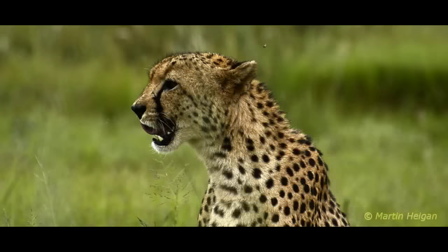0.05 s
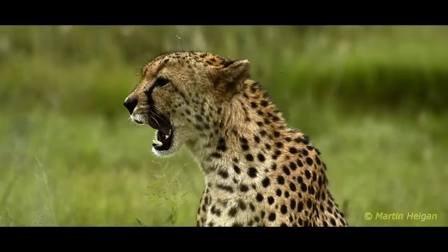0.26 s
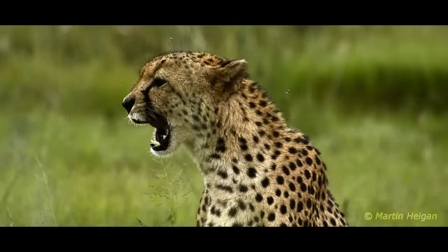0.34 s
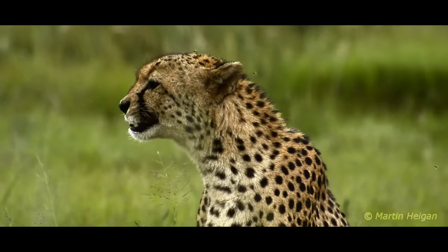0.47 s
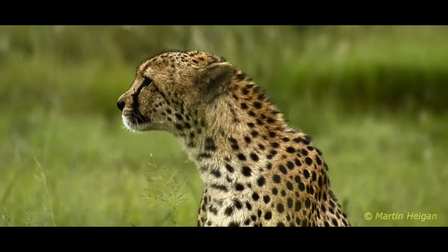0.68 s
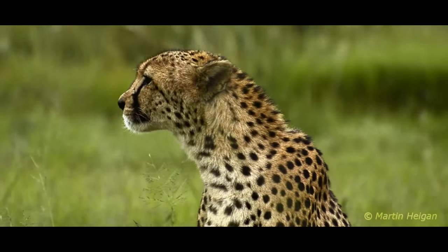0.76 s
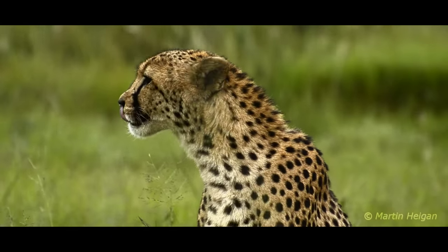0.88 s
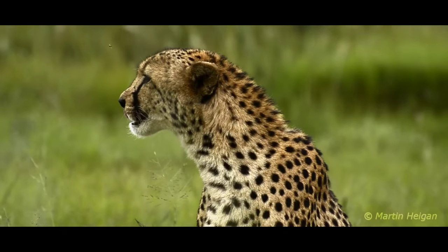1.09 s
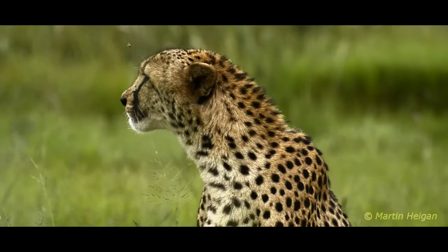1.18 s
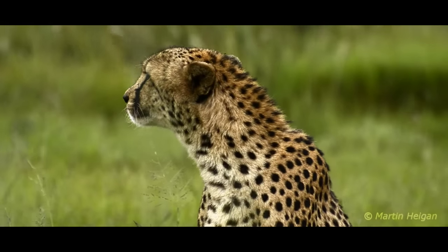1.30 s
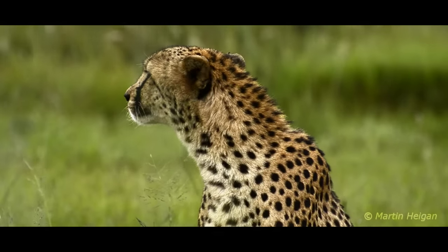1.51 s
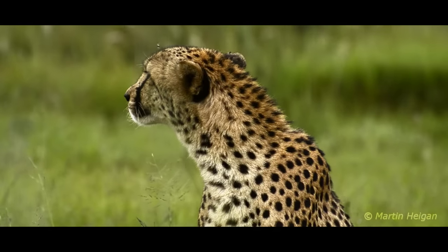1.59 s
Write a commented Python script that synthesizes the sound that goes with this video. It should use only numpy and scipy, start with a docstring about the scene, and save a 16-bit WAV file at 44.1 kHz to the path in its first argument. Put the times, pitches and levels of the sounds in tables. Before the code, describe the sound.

One short, clear cheetah chirp near the start, central and fairly dry, after low wind puffs and thin bird whistles; afterwards more faint birds, a wind puff and muffled bumps over outdoor hum and light wide hiss.

```python
"""A cheetah gives one short chirp in open grassland, over a steady faint hum, outdoor air and hiss.
First come two low puffs of wind and the first thin whistles of far birds, made from gliding tones.
Then the chirp: an arched, nearly pure note from a stack of sine waves, ending in a weak falling squeak.
More birds follow, then soft bumps, with one more puff among them; bumps and puffs are swells of noise."""
import sys
import numpy as np
from scipy import signal
from scipy.fft import rfft, irfft, next_fast_len
from scipy.io import wavfile
from scipy.ndimage import uniform_filter1d

SR = 44100
rng = np.random.default_rng(int(sys.argv[2]) if len(sys.argv) > 2 else 0)


def transcribe(u):
    """Save the signal u as a 16-bit wav file named by the first command-line argument.

    u: samples, shape (n,) or (channels, n), limited to [-1, 1]; the rate is SR.
    q: integer samples, one column per channel.
    """
    v = np.clip(np.atleast_2d(u).T, -1, 1)
    q = np.round(v * 32767).astype(np.int16)
    wavfile.write(sys.argv[1], SR, q)


N = 72765
T = np.arange(N) / SR  # time of every sample, in seconds

# Pitch of the vocal folds, before its small random shake: t/s, f/Hz
CHIRP_PITCH = [(.21, 612), (.219, 565.6), (.236, 593.4), (.256, 613), (.27, 613.3), (.285, 603.5),
               (.306, 577), (.316, 546), (.325, 553), (.337, 530), (.356, 408)]
# Level that drives the partials of the chirp: t/s, level/dB
CHIRP_LEVEL = [(.209, -58), (.2145, -32), (.224, -29), (.242, -21), (.264, -14.5), (.287, -11.5),
               (.298, -14), (.312, -22.5), (.323, -31.5), (.331, -50.5), (.35, -39), (.362, -53)]
# Partials of the voice: multiple of the pitch, level/dB at full drive, growth/dB per dB of drive
VOICE_PARTIALS = [(1, -46, 0.03), (2, -12, 1), (3, -48.5, .15), (4, -42.5, .45), (5, -52, 0.23),
                  (6, -73.5, 2.2), (7, -76, 3), (9, -75, 0.8), (10, -71.5, 0.5), (13, -79.5, 1.7)]
# Colour of the air rushing through the throat: f/Hz, relative level/dB per Hz
THROAT_COLOUR = [(400, -26), (1100, -7), (1800, 3.5), (2700, -5), (4000, -21.5), (8000, -24.5),
                 (14000, -43)]
# Far bird notes: start t/s, length/s, start f/Hz, middle f/Hz, end f/Hz, level/dB at the middle
BIRD_NOTES = [(0.041, 0.036, 4950, 4680, 4280, -66), (.105, 0.046, 4550, 4330, 4270, -61),
              (0.291, 0.08, 4700, 4560, 4230, -67), (.385, .055, 4450, 4250, 4170, -61),
              (0.574, 0.032, 4150, 4140, 4050, -62.5), (.645, 0.06, 4100, 4180, 4200, -66.5),
              (.618, .05, 1580, 1800, 1870, -56), (.669, 0.0216, 2080, 1920, 1710, -54)]
# Soft dull bumps: peak t/s, rise/s, decay/s, peak level/dB
BUMP_EVENTS = [(.617, .014, .018, -43), (1.22, .005, 0.022, -49), (1.278, 0.014, 0.022, -45),
               (1.302, .012, .032, -41.5), (1.403, 0.0085, 0.018, -41.5)]
# Colour of the bumps: f/Hz, relative level/dB per Hz
BUMP_SPECTRUM = [(60, -12), (140, -6), (230, -12.5), (345, 1.5), (440, -5.5), (530, -7.5), (700, -17.5),
                 (880, -15), (1100, -32), (3000, -33), (9000, -67)]
# Puffs of wind: peak t/s, rise/s, decay/s, peak level/dB
PUFF_EVENTS = [(.008, 0.015, 0.027, -39), (.085, .015, 0.014, -44), (.99, 0.034, .03, -42)]
# Colour of the puffs: f/Hz, relative level/dB per Hz
PUFF_SPECTRUM = [(8, -4.5), (25, -0.5), (45, -6.5), (80, -16), (200, -37), (1000, -87)]
# Colour of the outdoor air, the same in both ears: f/Hz, relative level/dB per Hz
AIR_COLOUR = [(10, -6.5), (35, 1.5), (65, -6.5), (95, -5), (135, 0), (195, -6.5), (290, -6), (420, -12),
              (800, -16.5), (1600, -20), (2450, -26.5), (3600, -20), (4250, -26), (4700, -37),
              (6000, -44.5), (15000, -53.5)]
# Faint wavering hum: f/Hz, width/Hz, level/dB
HUM_TONES = [(39.5, 8, -62), (76, 6, -64), (120.8, 8, -57.5), (158, 7.7, -59.5), (272, 11, -58.5),
             (612, 16, -65), (1218, 22, -70.5), (1517, 30, -69), (1828, 30, -77.5)]
# Colour of the microphone hiss: f/Hz, relative level/dB per Hz
HISS_COLOUR = [(150, -35), (260, -8), (420, -2.5), (1600, 1), (3500, -3), (6000, -8), (9000, -10.5),
               (14000, -16.5), (16000, -16.5)]
# Narrow dips in the treble: f/Hz, width/Hz, depth from 0 to 1
TREBLE_DIPS = [(5693, 190, .72), (6910, 103, 0.6), (14950, 330, .9)]

FULL_DB = -12  # drive at which the partials have their listed levels
EDGE_S = 0.0047  # fade at each end of the chirp
JITTER, ROUGH_JITTER = 0.0023, 0.014  # random shake of the pitch, as a fraction; extra at the end
ROUGH_FROM_S, ROUGH_RAMP_S = 0.306, 0.02
# Random shake of the level: none for a partial with growth 1, more the further its growth is from 1
SHIMMER_DB = 1.5
THROAT_AIR_DB = -59
# All partials but the second come in more softly and start to fade as the closing squeak begins
SIDE_RISE_S, SIDE_FADE_FROM_S, SIDE_FADE_DB_PER_S = 0.0089, 0.334, 500
# The mouth opens widest just before the loudest moment and lifts the fourth partial
MOUTH_S, MOUTH_WIDTH_S, MOUTH_LIFT_DB = 0.279, 0.021, 8
BIRD_WAVER = 0.03  # random shake of the pitch, as a fraction, for a note at 4500 Hz
BIRD_WET_DB, BIRD_T60_S = -8, 0.2  # level of the echo tail, time it takes to drop 60 dB
AIR_DB, PATCH_DB, HISS_DB = -48.5, 1.5, -62
CUTOFF_HZ, FADE_S = 15700, 0.004


def amp(db):
    """Turns decibels into a gain."""
    return 10 ** (np.asarray(db) / 20)


def unit(x):
    """Scales a signal to an average strength (rms) of 1."""
    return x / np.sqrt(np.mean(x ** 2) + 1e-20)


def filtered(x, gain):
    """Turns each frequency up or down by gain(frequency)."""
    size = next_fast_len(N + 4096)
    spectrum = rfft(x, size)
    return irfft(spectrum * gain(np.fft.rfftfreq(size, 1 / SR)), size)[..., :N]


def noise(colour):
    """Random noise of rms 1 whose spectrum passes through (Hz, dB) points."""
    hz, db = np.transpose(colour)
    white = rng.standard_normal(N)
    return unit(filtered(white, lambda f: amp(np.interp(np.log(f + 1), np.log(hz), db))))


def wander(rate_hz):
    """Smooth random ups and downs of rms 1; a higher rate moves faster."""
    return unit(filtered(rng.standard_normal(N), lambda f: np.exp(-(f / rate_hz) ** 2)))


def curve(points):
    """Joins (s, value) points with lines and rounds the corners."""
    return uniform_filter1d(np.interp(T, *np.transpose(points)), size=130)


def chirp():
    """Vocal folds make partials on one arch; the second rules the swell, and the folds falter at the end."""
    level = curve(CHIRP_LEVEL)
    since_start = T - CHIRP_LEVEL[0][0]
    until_end = CHIRP_LEVEL[-1][0] - T
    gate = np.clip(since_start / EDGE_S, 0, 1) * np.clip(until_end / EDGE_S, 0, 1)

    side_rise = np.clip(since_start / SIDE_RISE_S, 0, 1)
    side = side_rise * amp(-SIDE_FADE_DB_PER_S * np.maximum(T - SIDE_FADE_FROM_S, 0))
    mouth = amp(MOUTH_LIFT_DB * np.exp(-((T - MOUTH_S) / MOUTH_WIDTH_S) ** 2))
    shapes = {2: 1, 4: side * mouth}  # every other partial uses side alone

    jitter = JITTER + ROUGH_JITTER * np.clip((T - ROUGH_FROM_S) / ROUGH_RAMP_S, 0, 1)
    pitch = curve(CHIRP_PITCH) * (1 + jitter * wander(rate_hz=290))
    phase = 2 * np.pi * np.cumsum(pitch) / SR
    voice = np.zeros(N)
    for multiple, db, growth in VOICE_PARTIALS:
        shimmer = SHIMMER_DB * (1 - growth) * wander(rate_hz=120)
        strength = amp(db + growth * (level - FULL_DB) + shimmer)
        voice += strength * np.sin(multiple * phase) * shapes.get(multiple, side)
    throat_air = noise(THROAT_COLOUR) * amp(THROAT_AIR_DB)
    return gate * (np.sqrt(2) * voice + throat_air)  # root 2 gives a sine an rms of 1


def birds():
    """Thin gliding whistles, the high ones buzzier, blurred by distance with a fading echo tail."""
    direct = np.zeros(N)
    for start, length, first_hz, middle_hz, last_hz, db in BIRD_NOTES:
        progress = np.clip((T - start) / length, 0, 1)
        glide = np.interp(progress, [0, .5, 1], [first_hz, middle_hz, last_hz])
        waver = BIRD_WAVER * middle_hz / 4500 * wander(rate_hz=300)
        hz = glide * (1 + waver)
        envelope = np.sqrt(2 * abs(np.sin(np.pi * progress)))
        direct += amp(db) * envelope * np.sin(2 * np.pi * np.cumsum(hz) / SR)
    tail = rng.standard_normal(N) * np.exp(-np.log(1000) * T / BIRD_T60_S)
    echo = signal.fftconvolve(direct, tail / np.linalg.norm(tail))[:N]
    return direct + amp(BIRD_WET_DB) * echo


def swells(events, colour):
    """Noise that rises to each event's peak and dies away after it."""
    envelope = np.zeros(N)
    for peak, rise, decay, db in events:
        envelope += amp(db) * np.exp(-np.maximum((peak - T) / rise, (T - peak) / decay))
    return envelope * noise(colour)


def bumps():
    """Soft dull thuds: short swells of mostly low noise."""
    return swells(BUMP_EVENTS, BUMP_SPECTRUM)


def wind_puffs():
    """Low puffs of wind: swells of very deep noise."""
    return swells(PUFF_EVENTS, PUFF_SPECTRUM)


def outdoor_air():
    """Steady coloured noise whose level varies gently in patches of time and frequency."""
    grid = signal.stft(noise(AIR_COLOUR), nperseg=512)[2]
    across_pitch = uniform_filter1d(rng.standard_normal(grid.shape), size=6, axis=0)
    patches = unit(uniform_filter1d(across_pitch, size=10, axis=1))
    air = signal.istft(grid * amp(PATCH_DB * patches), nperseg=512)[1][:N]
    return amp(AIR_DB) * unit(air)


def hum():
    """Faint tones that waver because two random signals steer their cosine and sine parts."""
    total = np.zeros(N)
    for hz, width, db in HUM_TONES:
        angle = 2 * np.pi * hz * T
        total += amp(db) * (wander(width) * np.cos(angle) + wander(width) * np.sin(angle))
    return total


def microphone_hiss():
    """Separate coloured noise for each ear, so the hiss sounds wide."""
    return amp(HISS_DB) * np.array([noise(HISS_COLOUR), noise(HISS_COLOUR)])


def scene():
    """Every source sits in the centre; only the hiss is wide."""
    return chirp() + birds() + bumps() + wind_puffs() + outdoor_air() + hum() + microphone_hiss()


def record(dry):
    """Softens both ends, cuts narrow dips in the treble, then removes the highest frequencies."""
    ends = np.sin(np.pi / 2 * np.clip(np.minimum(T, T[::-1]) / FADE_S, 0, 1))

    def dips(f):
        """Gain with a smooth notch at each listed frequency."""
        notches = [1 - depth * np.exp(-((f - hz) / width) ** 2) for hz, width, depth in TREBLE_DIPS]
        return np.prod(notches, axis=0)

    dipped = filtered(dry * ends, dips)
    lowpass = signal.firwin(511, CUTOFF_HZ, window=("kaiser", 9), fs=SR)
    return signal.oaconvolve(dipped, lowpass[None], "same")


dry = scene()
out = record(dry)
transcribe(out)
```